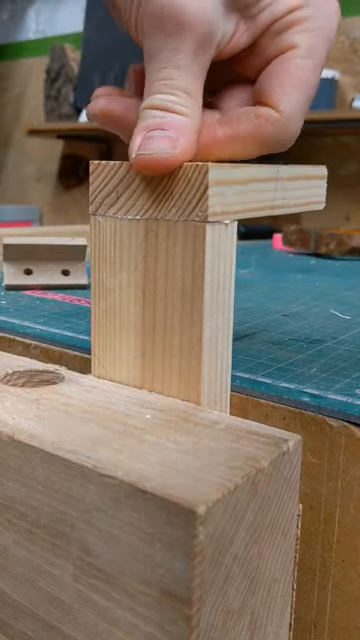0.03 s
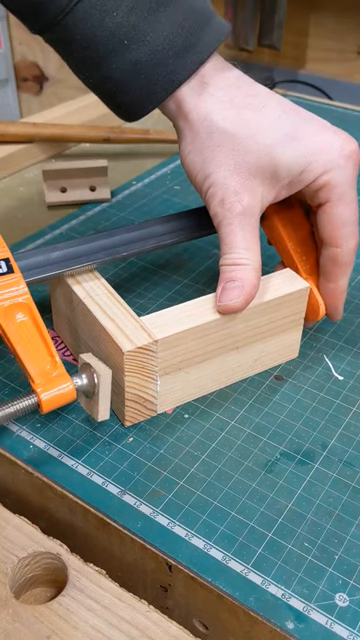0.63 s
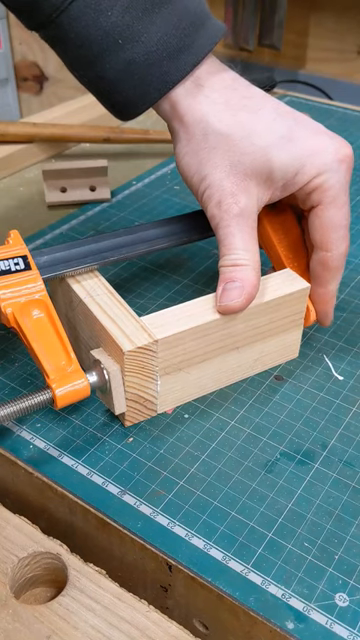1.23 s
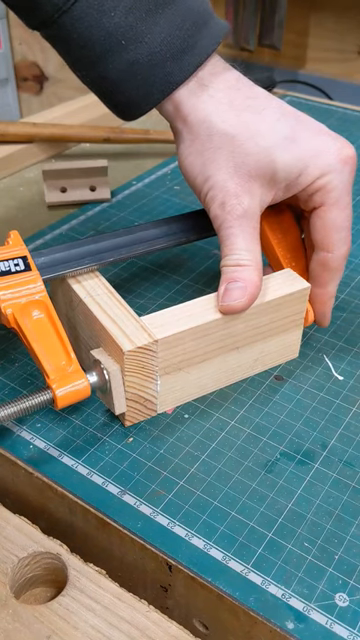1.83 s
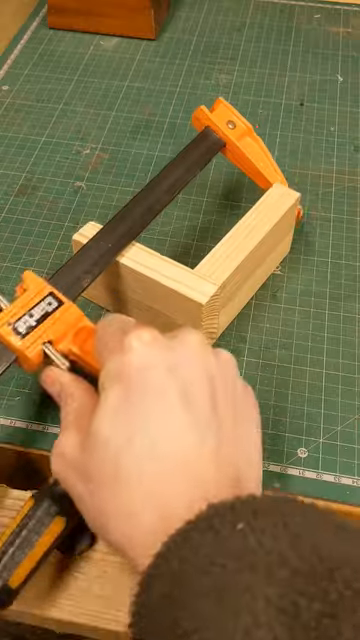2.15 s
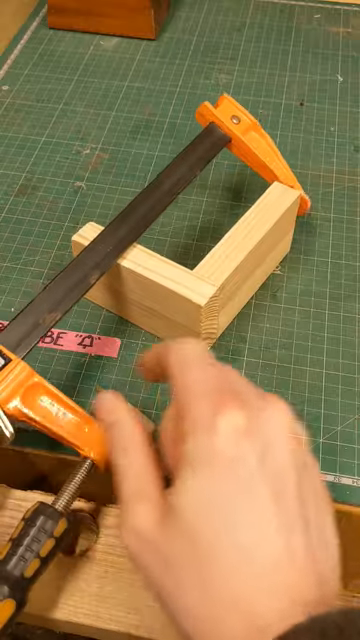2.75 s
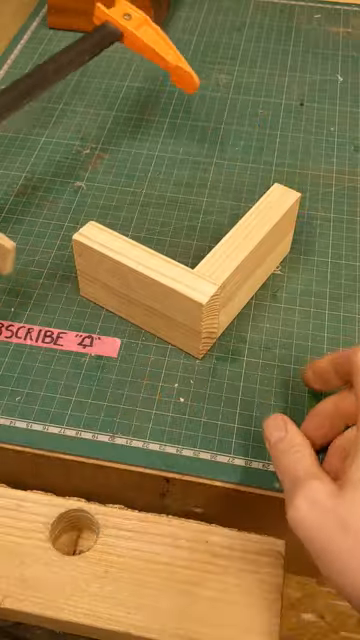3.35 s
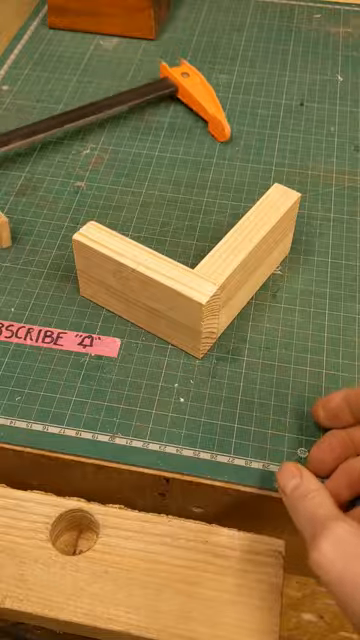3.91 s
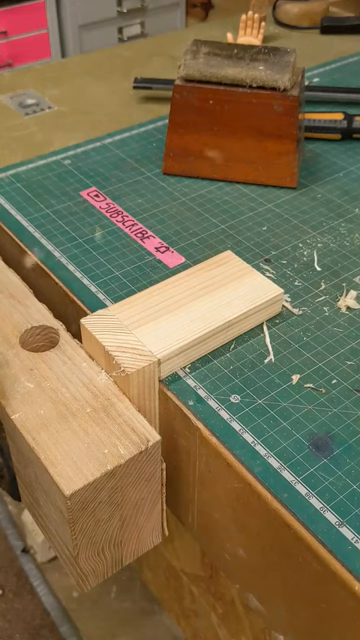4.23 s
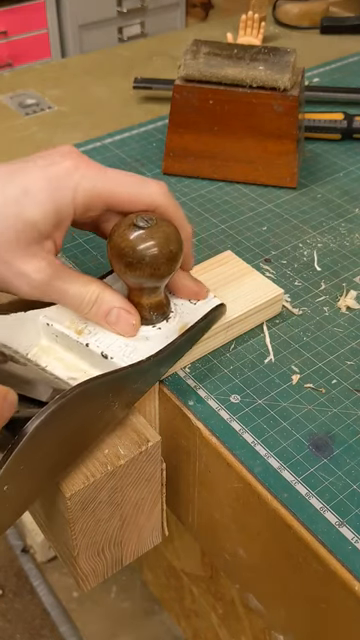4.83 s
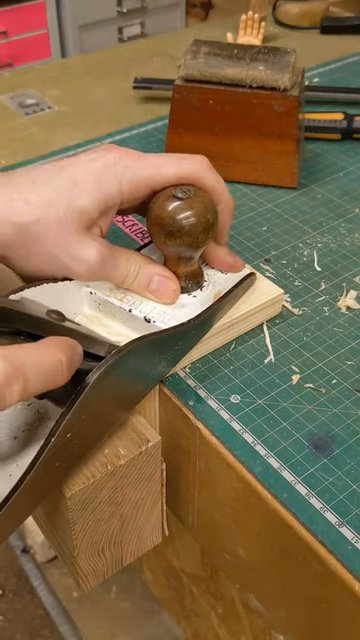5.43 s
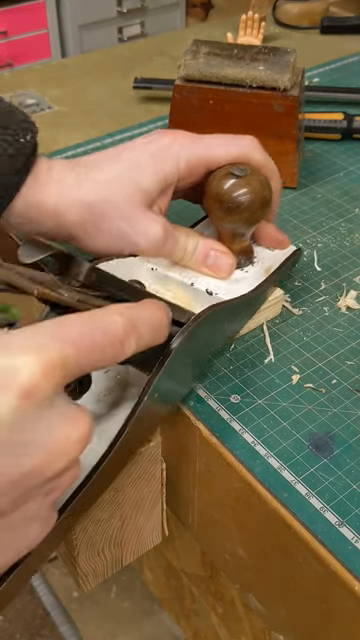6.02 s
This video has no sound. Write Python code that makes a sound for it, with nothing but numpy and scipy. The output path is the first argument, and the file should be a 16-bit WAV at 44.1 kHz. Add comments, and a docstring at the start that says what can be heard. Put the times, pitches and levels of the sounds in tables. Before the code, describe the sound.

Close sounds in a small workshop, with short reverberation and a faint rumble and hiss that shifts in level. After very faint wooden bumps, a steel bar clamp rattles shut from 0.4 to 1.4 seconds: about a dozen bright, unevenly spaced, ringing clinks. These are the loudest sounds, and several overload the microphone with low thumps. At 2.1 seconds the clamp clicks, then slides open in two short, gritty scrapes with a tiny high squeak. Faint ticks and a soft bump follow. Wood and clamp knock on the bench at 3.8 and 4.1 seconds, followed by a few light, quick brushes. At 4.7 seconds a metal hand plane lands on a board with a quick double knock and low thud, then glides quietly into place. It rasps over the end grain in four short pushes at about 5.3, 5.5, 5.7 and 6 seconds, the last two louder.

```python
"""A steel bar clamp rattles shut at a woodworking bench in a small shop, and later scrapes open.
Each catch of its jaw rings the modes of the steel; several later clinks overload the microphone and thump.
Wood and clamp knock on the bench. A metal hand plane lands on a board, glides into place and rasps over
the end grain in four short pushes, as tiny frictional slips drive the resonances of tool and wood.
Short reverberation and a low rumble and hiss of the shop surround these close sounds."""
import sys
import numpy as np
from scipy import signal
from scipy.fft import irfft
from scipy.io import wavfile
from scipy.ndimage import uniform_filter1d

SR = 44100
rng = np.random.default_rng(int(sys.argv[2]) if len(sys.argv) > 2 else 0)


def dump_mix(stems):
    """Bounce the given channels to the path in sys.argv[1] as a 16-bit WAV at rate SR."""
    frames = np.atleast_2d(stems).T  # one column per channel
    limited = np.clip(frames, -1, 1)  # hard clip at full scale
    pcm = np.round(limited * 32767).astype(np.int16)
    wavfile.write(sys.argv[1], SR, pcm)


N = 271656
HZ = np.fft.rfftfreq(8192, 1 / SR)
LEAD_S = .02  # an impact's noise begins this long before its peak

# Spectrum of small hard contacts. Each row: frequency in Hz, level in dB.
CLICK_SPECTRUM = [(80, -14), (400, -9), (1400, -5), (2500, -10.5), (4100, 4.5), (5500, -1.5), (8000, -6.5),
                  (12000, -3.5), (16000, -15.5)]
# Spectrum of the plane's sole rubbing on wood. Each row: frequency in Hz, level in dB.
SOLE_SPECTRUM = [(29, -43), (50, -2), (81, 2.5), (138, -14), (218, 3), (284, -7.5), (345, 1), (461, -2),
                 (842, -6), (1430, -5.5), (1620, -3), (2060, -7), (5400, -17.5), (10900, -12.5),
                 (16000, -33)]


def gain_of(db):
    """The amplitude ratio of a level in decibels."""
    return 10 ** (np.asarray(db) / 20)


def unit_rms(x):
    """Normalisation to a mean power of one."""
    return x / np.sqrt(np.mean(x ** 2) + 1e-20)


def curve_at(points, hz=HZ):
    """Interpolation on a logarithmic frequency axis."""
    f, value = np.transpose(points)
    return np.interp(np.log(hz + 1), np.log(f + 1), value)


def resonance_db(peaks):
    """Resonances and hollows as Lorentzian curves on the decibel scale."""
    return sum(db / (1 + (2 * (HZ - hz) / width) ** 2) for hz, width, db in peaks)


def add(mix, s, sound):
    """Superposition of a sound on the mix, starting at s seconds."""
    start = round(s * SR)
    sound = sound[max(-start, 0):]
    part = mix[max(start, 0):][:len(sound)]
    part += sound[:len(part)]


def coloured(x, gain):
    """A minimum-phase filter of unit energy imposes a spectral shape given over HZ."""
    log_gain = np.log(np.maximum(gain / gain.max(), 1e-5))
    mirrored = np.concatenate([log_gain, log_gain[-2:0:-1]])
    response = np.exp(np.conj(signal.hilbert(mirrored)))
    taps = irfft(response[:len(HZ)])[:len(HZ)]
    return signal.oaconvolve(x, taps / np.linalg.norm(taps))[:len(x)]


def three_bands(low_hz, high_hz, order=8):
    """A power-complementary crossover: low, middle and high gains whose squares sum to one."""
    low, high = 1 / (1 + (HZ / low_hz) ** order), 1 / (1 + (HZ / high_hz) ** order)
    return np.sqrt([low, np.abs(high - low), 1 - high])


def band_noise(low_hz, high_hz, length):
    """Band-limited Gaussian noise of unit power."""
    bandpass = signal.butter(2, [low_hz, high_hz], "band", fs=SR)
    return unit_rms(signal.lfilter(*bandpass, rng.standard_normal(length)))


def background():
    """Ambient noise in three bands, rumble, air and hiss, steps in level at a few moments."""
    # Each row: start in seconds, air level in dB, rumble level in dB.
    levels = [(0, -76, -71), (.288, -64.5, -58), (2.1, -58.5, -50), (2.492, -74, -65.5),
              (3.35, -69.5, -66.5), (4.11, -60, -54), (4.712, -60.5, -55)]
    # Each row: frequency in Hz, level in dB.
    spectrum = [(12, -34.5), (20, 3.5), (101, -7.5), (158, -15), (210, -9), (262, -19), (293, -12),
                (388, -17.5), (873, -18), (1190, -22.5), (4670, -34.5), (7520, -42), (12800, -38),
                (16000, -44.5)]
    starts, air, rumble = np.transpose(levels)
    hiss = air - 7.5
    section = np.searchsorted(starts[1:], np.arange(N) / SR)
    colour, out = gain_of(curve_at(spectrum)), np.zeros(N)
    for db, band in zip([rumble, air, hiss], three_bands(220, 3500)):
        envelope = gain_of(uniform_filter1d(db[section], size=200))
        out += envelope * coloured(rng.standard_normal(N), colour * band)
    return out


def ring(modes, t, shade, scatter_db, detune):
    """Free vibration is a sum of damped modes; each blow sets their phases and its grip shifts their pitch."""
    hz, db, t60 = np.transpose(modes)[:, :, None]
    phase, strength, shift = rng.uniform(-1, 1, (3, len(modes), 1))
    amplitude = gain_of(db + scatter_db * strength) * np.interp(hz, HZ, shade)
    cycles = hz * (1 + detune * shift) * t + phase
    waves = amplitude * gain_of(-60 * t / t60) * np.sin(2 * np.pi * cycles)
    return waves.sum(0) / np.sqrt(np.sum(gain_of(db) ** 2) / 2)


def impact(spectrum, modes, shade, fall_s, ring_db, rise_s, detune, scatter_db=0):
    """Impact excitation: contact noise peaks, then the body rings; the gain curve shade weights both."""
    t = np.arange(-LEAD_S, .36, 1 / SR)
    envelope = np.exp(-np.abs(t) / np.where(t < 0, rise_s, fall_s))
    crunch = coloured(envelope * rng.standard_normal(len(t)), gain_of(curve_at(spectrum)) * shade)
    crunch *= np.linalg.norm(envelope) / np.linalg.norm(crunch)
    after = np.maximum(t, 0)
    onset = 1 - np.exp(-after / 0.00069)
    return crunch + gain_of(ring_db) * onset * ring(modes, after, shade, scatter_db, detune)


def impacts(rows, spectrum, modes, ring_db, rise_s, detune):
    """The contact shapes the spectrum: heavy blows carry more bass, hard ones more treble."""
    out = np.zeros(N)
    for s, db, bass_db, treble_db, fall_s in rows:
        shade = gain_of(curve_at([(350, bass_db), (1000, 0.0046), (2000, 0), (8000, treble_db)]))
        add(out, s - LEAD_S, gain_of(db) * impact(spectrum, modes, shade, fall_s, ring_db, rise_s, detune))
    return out


def bench_knocks():
    """Wood and clamp strike the bench and excite its low, well-damped modes."""
    # Each row: time in seconds, level, bass and treble in dB, decay time in seconds.
    knocks = [(.002, -54.5, 8, -7, 0.01), (.097, -56.5, 14.5, -8, 0.042), (.194, -56.5, 8, -17, 0.015),
              (2.8935, -47, 12.5, -36, 0.0099), (3.8282, -28, 6.5, -7, 0.0061), (4.057, -34, 7, -4, 0.0026),
              (4.0625, -27.5, 13, 7, 0.0084), (4.091, -40, -3, -17, 0.0054), (4.868, -52, 25.5, -14, .0027)]
    # Contact noise. Each row: frequency in Hz, level in dB.
    spectrum = [(60, -10.5), (150, -2), (240, -11.5), (360, -4), (480, 8.5), (650, 2.5), (950, 5),
                (1300, 0.5), (1650, -1), (2100, -1.5), (4000, -4.5), (7000, -15.5), (15000, -32)]
    # Each row: frequency in Hz, level in dB, T60 in seconds.
    wood_modes = [(317, 0, 0.113), (363.3, 2, 0.14), (653, -4, 0.17), (950, -20, 0.065), (1260, -29, 0.046),
                  (1960, 1.5, 0.044), (2300, -26, 0.054), (3020, -37, .06)]
    return impacts(knocks, spectrum, wood_modes, ring_db=-16, rise_s=0.00064, detune=0.03)


def clamp_rattle():
    """Impacts ring the steel as the jaw tips and catches on the bar, then chatters, softer and brighter."""
    # Each row: time in seconds, level in dB, decay time in seconds, tilt in dB per octave, ring in dB.
    catches = [(0.4347, -28.5, 0.0016, -3, -5.5), (0.4528, -37, .008, -2.5, -15.5),
               (0.4761, -24, 0.0066, -0.3, -14.5), (.518, -9, 0.003, 2.1, -14.5),
               (0.5824, -9, 0.0044, 1.5, -9.5), (0.656, -10.5, .0046, -1.5, -9),
               (0.7004, -14, 0.0064, 0.5, -16), (0.7889, -14, 0.0054, -0.5, -5.5),
               (0.8337, -14, 0.0064, 0.5, -8.5), (0.87, -13, 0.0041, 2, -6.5),
               (0.882, -23.5, 0.012, -1.5, -11.5), (.912, -13.5, 0.005, 0, -8),
               (1.096, -14, 0.0027, 0, -12), (1.1247, -26, 0.0042, -2, -9),
               (1.154, -13, 0.0028, -1.5, -12.5), (1.4196, -18, 0.0078, -1, -8)]
    # Contact noise. Each row: frequency in Hz, level in dB.
    spectrum = [(150, -13.5), (400, -13), (700, -13.5), (1100, -18), (1900, -12.5), (2600, -14.5),
                (3400, -3.5), (4200, -9.5), (5000, 0), (7700, -14), (9300, -4.5), (10300, 6), (11500, -5),
                (16000, -10.5)]
    # Bar and jaw. Each row: frequency in Hz, level in dB, T60 in seconds.
    steel_modes = [(3320, -6.5, 0.17), (3365, -2, 0.078), (3680, -17, 0.086), (4205, -8.5, .13),
                   (4310, -15, 0.17), (5150, -9, 0.04), (5290, -5, 0.058), (5295, -17.5, 0.084),
                   (5955, -15, 0.084), (6930, -14, 0.16), (7280, -17.5, 0.15), (8980, -4, 0.056),
                   (9760, -19, .13), (10000, -6.5, 0.11), (10170, 2.5, 0.098), (10630, -7, 0.14),
                   (9800, -13.5, 0.22), (12110, -4, 0.1), (11980, -18, 0.1315), (15720, -12.5, 0.16)]
    # The travelling jaw damps some resonances and frees another.
    # Each row: frequency in Hz, width in Hz, change from first catch to last in dB.
    travel_peaks = [(3350, 500, -7.5), (5000, 450, 5), (6000, 990, -8.5)]
    chatter_delay_s, chatter_fall_s, chatter_db, chatter_db_per_octave = 0.0088, .006, -11, 2.5
    contact = dict(rise_s=.0015, detune=0.011, scatter_db=5)
    octaves = np.log2(np.maximum(HZ, 1000) / 7000)
    travel_db, out = resonance_db(travel_peaks), np.zeros(N)
    for place, (s, db, fall_s, tilt, ring_db) in zip(np.linspace(-.5, .5, len(catches)), catches):
        shade = gain_of(tilt * octaves + place * travel_db)
        catch = impact(spectrum, steel_modes, shade, fall_s, ring_db, **contact)
        brighter = shade * gain_of(chatter_db_per_octave * octaves)
        chatter = impact(spectrum, steel_modes, brighter, chatter_fall_s, ring_db, **contact)
        add(out, s - LEAD_S, gain_of(db) * catch)
        add(out, s - LEAD_S + chatter_delay_s, gain_of(db + chatter_db) * chatter)
    return gain_of(-4.5) * out


def overload_thumps(bass_cut_hz=42, treble_cut_hz=1560):
    """Several later clinks overload the microphone: an offset relaxes through its bass cut as a low thump."""
    # Each row: start in seconds, signed offset, relaxation time in seconds.
    overloads = [(0.6554, -0.23, 0.001), (0.654, -0.0094, 0.0068), (0.7026, 0.064, .011),
                 (0.7899, -0.13, .011), (0.8338, 0.12, 0.013), (.9128, -0.11, 0.0093),
                 (1.1543, -0.18, 0.02)]
    out, t = np.zeros(N), np.arange(SR // 4) / SR
    for s, offset, relax_s in overloads:
        add(out, s, offset * np.exp(-t / relax_s))
    out = signal.lfilter(*signal.butter(1, treble_cut_hz, fs=SR), out)
    return signal.lfilter(*signal.butter(1, bass_cut_hz, "high", fs=SR), out)


def tool_clicks():
    """Brief contacts of clamp, wood and blade excite high modes that decay quickly."""
    # Each row: time in seconds, level, bass and treble in dB, decay time in seconds.
    clicks = [(2.104, -26.5, -3, -4, 0.0034), (2.1097, -22, 2.5, -11.5, 0.003),
              (2.1455, -24.5, 6, -15, 0.0014), (2.526, -42, 6, 6, .0048), (2.596, -54, -10, -25, 0.0028),
              (2.623, -55.5, -8, -21, 0.0054), (4.012, -34.5, 0, -6.5, 0.0039),
              (4.0635, -35.5, -6, -2, 0.0035), (4.110, -28.5, -17, -10.5, 0.0098),
              (4.359, -41, -11, 14, 0.0089), (4.583, -55.5, -11, 1, 0.011), (5.304, -35, -6, -10, .009),
              (5.618, -51.5, 0, -12, .014)]
    # Each row: frequency in Hz, level in dB, T60 in seconds.
    jaw_modes = [(1500, -15, 0.067), (1966, -5.5, 0.073), (3070, -8, .04), (3930, 6, 0.029),
                 (4030, -1, 0.017), (4520, -17.5, 0.042), (7490, -40, 0.07), (12700, -11, .03)]
    return impacts(clicks, CLICK_SPECTRUM, jaw_modes, ring_db=-12, rise_s=0.0005, detune=0.067)


def stroke_envelopes(strokes, bite, dulling_db_per_s, fizz_db):
    """Body, rasp and fizz follow a stroke's force by power laws; with bite above 1 the treble grows faster."""
    t, bands = np.arange(N) / SR, np.zeros((3, N))
    flank_shape = 1.17  # 1 is exponential, 2 is bell-shaped
    for s, db, swell, hold, release, treble_db in strokes:
        away = np.maximum((s - t) / swell, 0) + np.maximum((t - s - hold) / release, 0)
        near = away < 8
        force = np.exp(-away[near] ** flank_shape)
        rasp = force ** bite * gain_of(treble_db - dulling_db_per_s * np.maximum(t[near] - s, 0))
        fizz = rasp * force ** max(bite - 1, 0) * gain_of(fizz_db)
        bands[:, near] += gain_of(db) * np.array([force, rasp, fizz])
    return bands


def friction(envelopes, spectrum, peaks, slips_per_s, spread_db, hiss, judder_db, judder_hz):
    """Shot noise of slips and breaking fibres, bunched by a juddering hand, drives tool and wood."""
    sizes = gain_of(spread_db * np.minimum(rng.exponential(1, N), 4)) * rng.choice([-1, 1], N)
    slips = unit_rms(sizes * (rng.random(N) < slips_per_s / SR))
    judder = band_noise(judder_hz / 4, judder_hz, N)
    drive = unit_rms((slips + hiss * rng.standard_normal(N)) * gain_of(judder_db * judder))
    body = gain_of(curve_at(spectrum) + resonance_db(peaks))
    bands = three_bands(3000, 8000)
    return sum(coloured(drive * envelope, body * band) for envelope, band in zip(envelopes, bands))


def jaw_scrape():
    """Sliding friction sounds the clamp's resonances as the jaw is drawn open along the bar."""
    # Each row: full force at a time in seconds, level in dB, swell, hold, release in seconds, treble in dB.
    strokes = [(2.187, -33, 0.035, 0.035, 0.013, 4), (2.322, -34, 0.032, 0.069, 0.017, 2)]
    # Each row: frequency in Hz, level in dB.
    spectrum = [(29, -25.5), (50, -4), (141, -22), (184, -4), (277, -5.5), (461, -2), (729, -9), (927, 0),
                (1780, -6.5), (3670, -9), (4040, -7), (7570, -10.5), (12900, -28.5), (16000, -41)]
    # Each row: frequency in Hz, width in Hz, lift in dB.
    peaks = [(78, 36, 12), (457, 420, 7.5), (780, 110, 6.5), (1415, 340, 5), (3194, 126, 5),
             (4020, 243, 8.5), (4510, 190, 4), (12800, 300, 14.5)]
    envelopes = stroke_envelopes(strokes, bite=1.92, dulling_db_per_s=30, fizz_db=-6.5)
    scrape = friction(envelopes, spectrum, peaks, slips_per_s=1800, spread_db=0.5,
                      hiss=0.18, judder_db=2, judder_hz=260)
    return scrape + burr_grit(rasp=envelopes[1])


def burr_grit(rasp, catches_per_s=110, fall_s=0.0011, level_db=2.5):
    """The sliding jaw trips over burrs: a Poisson process of brief, bright noise bursts."""
    catches = (rng.random(N) < catches_per_s / SR) * rng.uniform(.5, 1, N)
    envelope = signal.lfilter([1], [1, -np.exp(-1 / (fall_s * SR))], catches)
    bursts = rasp * envelope * rng.standard_normal(N)
    return gain_of(level_db) * coloured(bursts, gain_of(curve_at(CLICK_SPECTRUM)))


def jaw_squeak(s, hz, width_s, level_db):
    """Stick-slip motion makes the jaw sing for a moment: a tone under a Gaussian envelope."""
    t = np.arange(N) / SR - s
    return gain_of(level_db) * np.exp(-(t / width_s) ** 2) * np.sin(2 * np.pi * hz * t)


def brushing():
    """Dense slips merge into broadband friction noise in a few light, quick strokes."""
    # Each row: full force at a time in seconds, level in dB, swell, hold, release in seconds, treble in dB.
    strokes = [(4.118, -33.5, 0.0036, 0.0054, 0.0087, 1.5), (4.28, -49.5, 0.012, 0.014, 0.01, 8),
               (4.372, -51.5, 0.0091, 0.0038, 0.018, 3), (4.453, -58, 0.017, 0.0064, 0.025, 3)]
    # Each row: frequency in Hz, level in dB.
    spectrum = [(120, -33), (200, 1), (316, -19), (635, -8.5), (1300, -4.5), (1770, 2), (2290, -4.5),
                (9930, 6.5), (16000, -11)]
    envelopes = stroke_envelopes(strokes, bite=1.09, dulling_db_per_s=25, fizz_db=0.5)
    return friction(envelopes, spectrum, [], slips_per_s=7000, spread_db=3.5,
                    hiss=1.04, judder_db=-0.2, judder_hz=202)


def plane_landing():
    """Two impacts, toe then heel, excite the shared modes of plane, board and bench."""
    # Each row: time in seconds, level, bass and treble in dB, decay time in seconds.
    contacts = [(4.712, -22.5, 4, -14, 0.0038), (4.7355, -25.5, 12.5, -19.5, 0.011)]
    # Contact noise. Each row: frequency in Hz, level in dB.
    spectrum = [(50, -34), (200, -8), (350, 7), (550, -6), (950, 8), (1800, -10.5), (2800, -6.5),
                (7000, -24), (15000, -36)]
    # Each row: frequency in Hz, level in dB, T60 in seconds.
    modes = [(79.6, 2, 0.33), (191.5, -4, 0.11), (342, 4, 0.09), (396, -18.5, 0.43), (623, -8, 0.15),
             (850, -18, 0.092), (932, 4, 0.11), (1186, -1.5, 0.12), (1390, -25, .1), (1630, 1.5, 0.045),
             (1820, -0.5, 0.037), (2853, -21, 0.17)]
    toe = impacts(contacts[:1], spectrum, modes, ring_db=0.5, rise_s=0.00022, detune=0)
    heel = impacts(contacts[1:], spectrum, modes, ring_db=-4.5, rise_s=0.00046, detune=0.013)
    return toe + heel


def bench_thud(s, hz, fall_s, level_db):
    """The plane's weight sets the bench top into damped narrow-band vibration."""
    t, out = np.arange(SR) / SR, np.zeros(N)
    envelope = (1 - np.exp(-t / 0.0051)) * np.exp(-t / fall_s)
    add(out, s, gain_of(level_db) * envelope * band_noise(hz - 35, hz + 35, SR))
    return out


def plane_glide():
    """Light sliding friction, brightening as it goes, accompanies the sole moving into place."""
    # Each row: full force at a time in seconds, level in dB, swell, hold, release in seconds, treble in dB.
    strokes = [(4.88, -57, 0.067, 0.386, 0.023, -11)]
    # Each row: frequency in Hz, width in Hz, lift in dB.
    peaks = [(348.7, 18, 26.5), (1193, 46, 13), (3650, 1600, 7.5), (9700, 780, 10)]
    envelopes = stroke_envelopes(strokes, bite=0.86, dulling_db_per_s=-17.5, fizz_db=-1.5)
    return friction(envelopes, SOLE_SPECTRUM, peaks, slips_per_s=6800, spread_db=2.5,
                    hiss=1.5, judder_db=0, judder_hz=60)


def plane_pushes():
    """Friction on end grain forces plane and board to vibrate; each push dulls along its length."""
    # Each row: full force at a time in seconds, level in dB, swell, hold, release in seconds, treble in dB.
    strokes = [(5.312, -37.5, 0.0088, 0.022, 0.02, -1), (5.49, -37.5, 0.045, 0.012, 0.033, -4.5),
               (5.703, -29.5, 0.035, .032, 0.024, -6), (5.992, -29, 0.033, 0.04, 0.11, -3.5)]
    # Resonances and hollows. Each row: frequency in Hz, width in Hz, lift in dB.
    peaks = [(83.5, 34, 9.5), (191.3, 26, 8.5), (357, 110, 12), (621, 22, 9), (865, 125, 11),
             (1183, 78, 12), (1440, 150, 11.5), (1010, 27, -4), (1602, 46, -33), (1710, 180, 6),
             (2074, 200, 8.5), (2460, 58, 5), (2850, 50, 8), (3880, 43, 8), (4890, 96, 8),
             (11200, 2300, -4)]
    envelopes = stroke_envelopes(strokes, bite=1.33, dulling_db_per_s=57, fizz_db=0)
    return friction(envelopes, SOLE_SPECTRUM, peaks, slips_per_s=4500, spread_db=3,
                    hiss=0.56, judder_db=0.1, judder_hz=310)


def blade_cuts():
    """Fibres fracture in sparser impulses where the blade bites into the end grain, in two of the pushes."""
    # Each row: full force at a time in seconds, level in dB, swell, hold, release in seconds, treble in dB.
    strokes = [(5.485, -38.5, 0.028, 0.027, .015, -22), (6.01, -33.5, 0.033, 0.083, 0.02, -19)]
    # Each row: frequency in Hz, level in dB.
    spectrum = [(200, -29), (700, -10.5), (1200, 4.5), (1600, -5.5), (2200, -1), (2800, -5.5),
                (3800, -19.5), (8000, -30)]
    envelopes = stroke_envelopes(strokes, bite=0.55, dulling_db_per_s=15, fizz_db=3)
    return friction(envelopes, spectrum, [], slips_per_s=900, spread_db=2,
                    hiss=0.13, judder_db=1.5, judder_hz=277)


def shop_reverb(x, wet_db, gap_s, echoes_per_s=4000):
    """Reverberation: dense reflections follow the direct sound, each band decaying at its own rate."""
    # Each row: frequency in Hz, T60 in seconds.
    decay_times = [(100, 0.53), (500, 0.18), (2000, 0.22), (6000, 0.19), (15000, 0.17)]
    t = np.arange(SR // 2) / SR
    echoes = rng.choice([-1., 1.], len(t)) * (rng.random(len(t)) < echoes_per_s / SR) * (t > gap_s)
    hz, age, frames = signal.stft(echoes, SR, nperseg=256)
    decay = gain_of(-60 * age / curve_at(decay_times, hz)[:, None])
    tail = signal.istft(frames * decay, SR, nperseg=256)[1]
    return x + gain_of(wet_db) * signal.oaconvolve(x, tail / np.linalg.norm(tail))[:N]


def scene():
    """Clamp, wood and plane superpose with their reflections and the shop's noise in one channel."""
    rattle = clamp_rattle()
    knocks = bench_knocks() + tool_clicks()
    landing = plane_landing()
    thud = bench_thud(s=4.712, hz=97, fall_s=0.11, level_db=-36)
    scrape = jaw_scrape() + jaw_squeak(s=2.216, hz=12700, width_s=0.01, level_db=-40)
    rubbing = scrape + brushing() + plane_glide() + plane_pushes() + blade_cuts()
    mix = shop_reverb(rattle, wet_db=-8.5, gap_s=0.002)
    mix += shop_reverb(knocks, wet_db=-10.5, gap_s=0.0034)
    mix += shop_reverb(landing + rubbing, wet_db=-11, gap_s=0.0029)
    return (mix + thud + overload_thumps() + background())[None]


def record(dry):
    """A linear-phase low-pass filter limits the bandwidth to about 16 kHz."""
    lowpass = signal.firwin(301, 16050, window=("kaiser", 8), fs=SR)
    return signal.oaconvolve(dry, lowpass[None], "same")


dry = scene()
out = record(dry)
dump_mix(out)
```